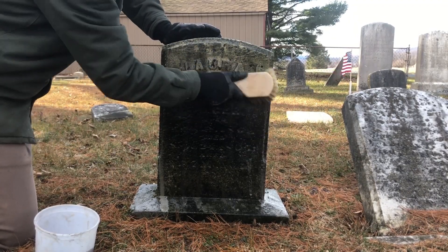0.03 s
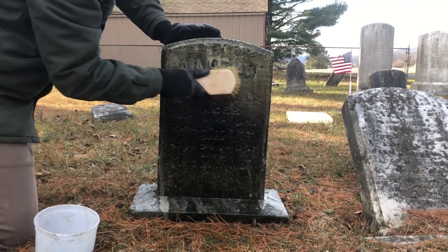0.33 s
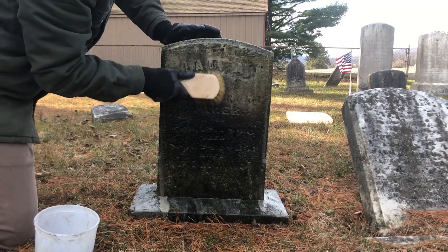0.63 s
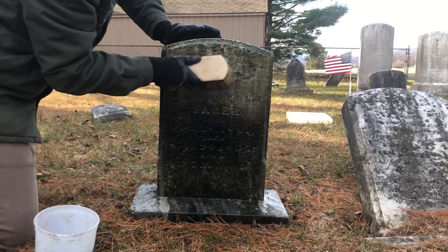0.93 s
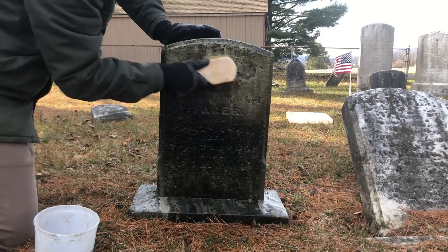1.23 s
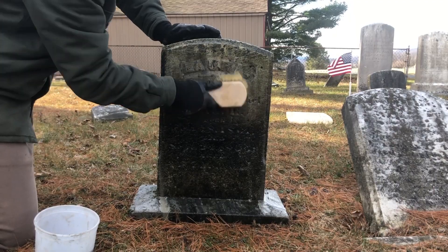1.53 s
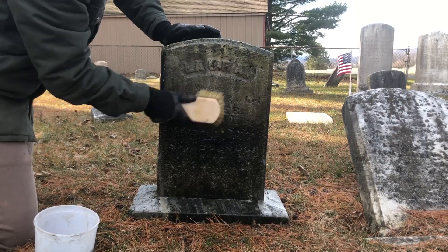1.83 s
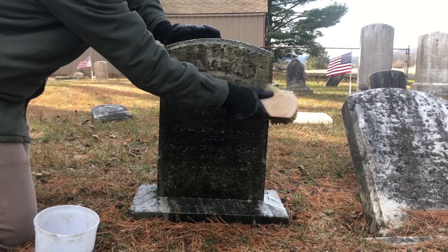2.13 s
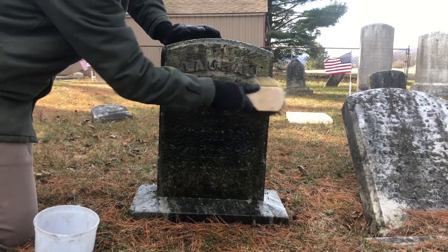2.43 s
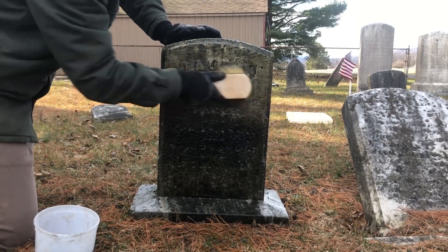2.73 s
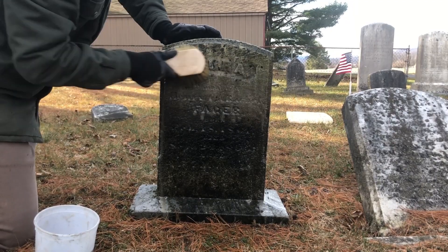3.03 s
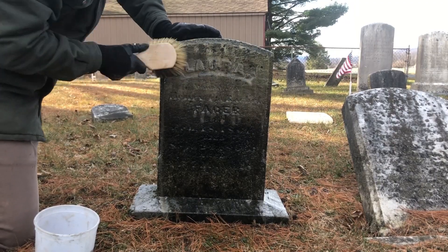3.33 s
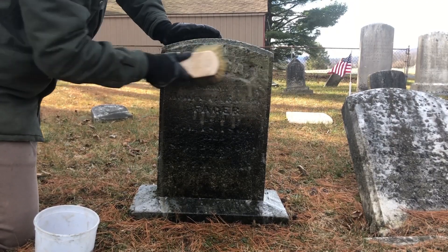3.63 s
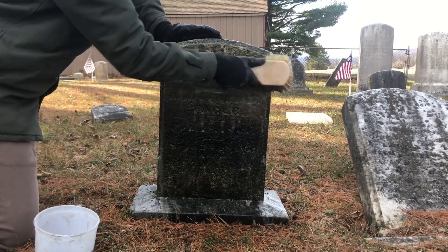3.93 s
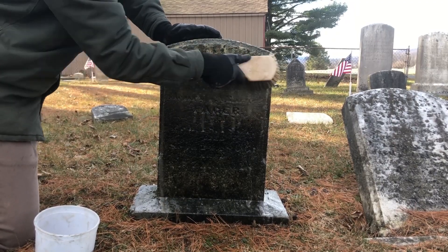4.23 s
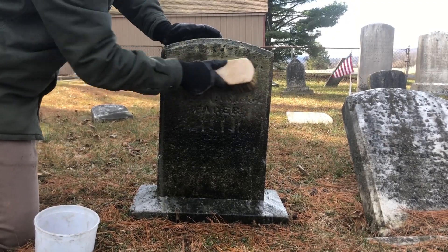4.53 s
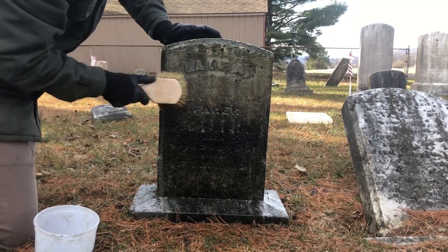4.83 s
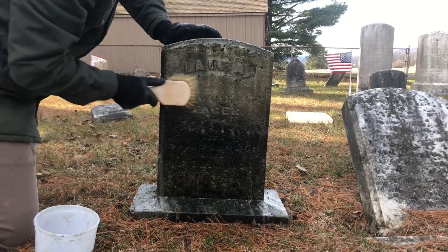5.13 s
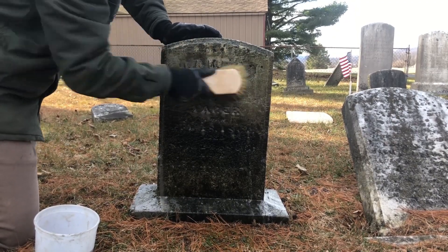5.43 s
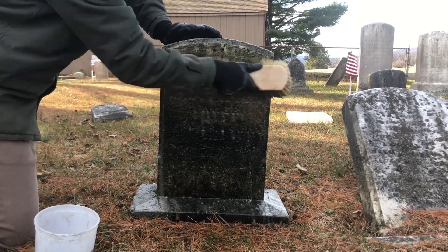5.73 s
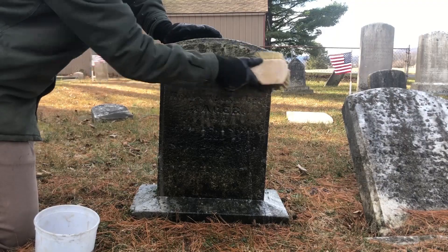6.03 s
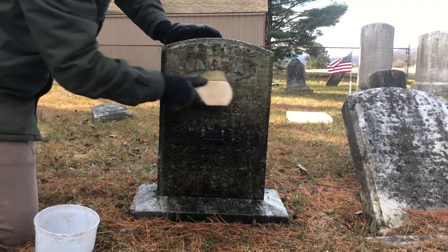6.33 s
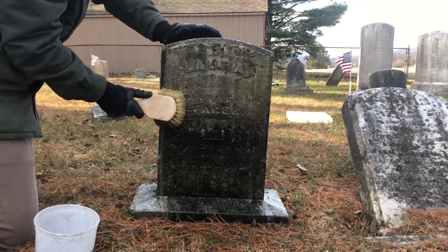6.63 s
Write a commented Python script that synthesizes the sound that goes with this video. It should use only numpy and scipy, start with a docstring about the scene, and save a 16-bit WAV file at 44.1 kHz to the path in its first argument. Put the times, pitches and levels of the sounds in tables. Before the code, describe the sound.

A stiff brush scrubs a wet headstone outdoors while wind buffets the microphone, much louder than the brush. For the first two seconds the bristles move in small quick circles, a continuous gritty hiss that swells about four times a second. From about 2 seconds to the end, near 6.7 seconds, they switch to brisk back-and-forth strokes, about six a second, with a slightly hollow rasp that changes tone between push and pull. The wind arrives at about 0.3 seconds in irregular gusts, a low rumble with flutter and short pops. The sharpest hits come between 1 and 2.3 seconds and around 4 seconds, with another strong gust near 4.7. It drops back from about 5.1 seconds, gusts again just before 6 seconds, then eases as the scrubbing continues. A faint, steady bed of outdoor air lies underneath.

```python
"""A stiff brush scrubs a wet upright stone outdoors: small circles first, then brisk strokes to and fro.
Bristle tips hiss on the grit, and the hollow between brush and stone colours push and pull differently.
Gusts buffet the microphone, much louder than the brush: large eddies rumble, small ones flutter
and single ones flick the port. A faint bed of outdoor air lies underneath."""
import sys
import numpy as np
from scipy import signal
from scipy.fft import rfft, irfft, next_fast_len
from scipy.io import wavfile
from scipy.ndimage import uniform_filter1d, minimum_filter1d, map_coordinates

SR = 44100
rng = np.random.default_rng(int(sys.argv[2]) if len(sys.argv) > 2 else 0)


def dump(signal):
    """Clip the signal to [-1, 1] and save it as 16-bit WAV at the path in sys.argv[1]."""
    limited = np.clip(np.atleast_2d(signal).T, -1, 1)
    pcm = np.round(limited * 32767).astype(np.int16)
    wavfile.write(sys.argv[1], SR, pcm)


N = 294147
TIME = np.arange(N) / SR


def from_db(db):
    """Decibels to gain."""
    return 10 ** (np.asarray(db) / 20)


def rms_one(x):
    """Scale to unit rms."""
    return x / np.sqrt(np.mean(x ** 2) + 1e-20)


def automation(rows):
    """Join timed breakpoints into one curve for each column after the time."""
    time_s, *columns = np.transpose(rows)
    return [np.interp(TIME, time_s, column) for column in columns]


def eq_db(curve, hz):
    """Read an EQ curve on a log-frequency axis."""
    freq_hz, gain_db = np.transpose(curve)
    return np.interp(np.log(hz + 1e-9), np.log(freq_hz), gain_db)


def coloured(x, curve):
    """Shape x with an EQ curve; rms 1."""
    size = next_fast_len(N)
    gain = from_db(eq_db(curve, np.fft.rfftfreq(size, 1 / SR)))
    return rms_one(irfft(rfft(x, size) * gain, size)[:N])


def drift(rate_hz):
    """A smooth random modulator, rolling off above rate_hz; rms 1."""
    step, settle = 16, 2000
    lowpass = signal.butter(2, rate_hz, fs=SR / step, output="sos")
    slow = signal.sosfilt(lowpass, rng.standard_normal(N // step + settle + 2))[settle:]
    return np.interp(np.arange(N) / step, np.arange(len(slow)), rms_one(slow))


def filtered(x, order, hz, kind):
    """Butterworth filter."""
    return signal.sosfilt(signal.butter(order, hz, kind, fs=SR, output="sos"), x)


def evened(x, samples):
    """Ride the level of a noise so that its short-term rms stays near 1."""
    return x / np.sqrt(uniform_filter1d(uniform_filter1d(x * x, samples), samples) + 1e-12)


def bent(x, bend):
    """Varispeed: raise or lower all pitches by a changing fraction."""
    return map_coordinates(x, [np.cumsum(1 + bend - bend.mean())], order=3, mode="mirror")


def slips(speed, density, spread_db):
    """Bristle tips snap over grains of stone, more often the faster they move; rms 1."""
    chance = np.clip(density * (speed + 0.11) / SR, 1e-4, 1)
    sizes = rng.standard_normal(N) * from_db(spread_db * rng.standard_normal(N))
    return rms_one((rng.random(N) < chance) * sizes / np.sqrt(chance))


# EQ of bristle tips on grit: freq_hz, gain_db
HISS_EQ = [(1200, -3), (2500, 4), (3300, 1.5), (4200, -0.5), (6300, 1), (7800, 0), (10000, 1.5), (12200, 3),
           (14000, 0.5), (16000, 2.5)]

def bristle_hiss(speed, shimmer_db=1.6, shimmer_hz=9):
    """Dense slips blur into hiss; tufts touch and let go, so each treble band swells on its own."""
    rest = coloured(slips(speed, density=40000, spread_db=-2.2), HISS_EQ)
    shimmering = 0
    for crossover_hz in np.geomspace(3500, 12500, 6):
        band = signal.sosfiltfilt(signal.butter(4, crossover_hz, fs=SR, output="sos"), rest)
        shimmering = shimmering + band * from_db(shimmer_db * drift(shimmer_hz))
        rest = rest - band
    return shimmering + rest


# Resonances of the brush against the stone, pushed and pulled: pitch_hz, width_hz, gain_db
PUSH_MODES = [(1210, 350, 0.5), (1750, 146, -6.5), (2266, 88, 6), (2790, 76, -2.5)]
PULL_MODES = [(1220, 210, 10.5), (1684, 310, 18.5), (2260, 120, -1.5), (2880, 130, -20)]

def hollow_rasp(speed, push_pull_power, glide=0.03, wander=0.0122):
    """Slips ring the hollow under the brush; with speed the tufts lean, it shrinks and the pitch lifts."""
    scrape = filtered(slips(speed, density=7000, spread_db=2.5), 2, [950, 3600], "band")
    bend = glide * speed + wander * drift(7.93)
    rasp = 0
    for modes, power in zip([PUSH_MODES, PULL_MODES], push_pull_power):
        ring = 0
        for k, (pitch_hz, width_hz, gain_db) in enumerate(modes):
            radius = np.exp(-np.pi * width_hz / SR)
            poles = [1, -2 * radius * np.cos(2 * np.pi * pitch_hz / SR), radius ** 2]
            gain = (-1) ** k * from_db(gain_db) * (1 - radius ** 2) / 2
            ring = ring + gain * signal.lfilter([1, 0, -1], poles, scrape)
        rasp = rasp + bent(rms_one(ring), bend) * np.sqrt(power)
    return rasp


# Circling, with two early hitches and a swell in each turn: time_s, level_db, swell_db
CIRCLING = [(0.0, -68, 3), (0.27, -66.5, -5.5), (0.3, -85, 13), (0.355, -62.5, -1), (0.425, -72.5, 2.5),
            (0.48, -67, 3), (0.95, -66.5, 4), (1.3, -66.5, -0.5), (2.0, -68.5, 1)]

def circles(circle_s=0.23, first_push_s=0.5, catch_db=0.5, fade_s=0.047, rasp_db=-5.0, bite=0.61):
    """The hand pushes and pulls once a circle. Gives speed, hiss power and push/pull rasp power."""
    pushing = np.cos(np.pi * (TIME - first_push_s) / circle_s) ** 2
    level_db, swell_db = automation(CIRCLING)
    fade_out = np.clip(1 - (TIME - STROKES[0][0]) / fade_s, 0, 1)   # hands over to the first stroke
    envelope = from_db(level_db + swell_db * (pushing - 0.5) + catch_db * drift(14.4)) * fade_out
    push_pull = np.array([pushing ** 2 * from_db(swell_db) ** bite, 1 - pushing])
    speed = 0.5 * envelope / envelope.max()
    return speed, envelope ** 2, push_pull * (envelope * from_db(rasp_db)) ** 2


# Strokes to and fro: start_s, length_s, level_db, rasp_offset_db, lean (0 pulled, 1 pushed)
STROKES = [(1.988, .188, -62.5, -2, 0.75), (2.219, .125, -61, -6, 0.26), (2.366, 0.1455, -62.5, -2.5, 0.58),
           (2.557, 0.131, -61.5, -6, 0), (2.7, 0.161, -63, -1, .6), (2.89, 0.156, -62, -11, 0.3),
           (3.04, 0.1764, -64.5, -1.5, 0.76), (3.254, .135, -62.5, -25, 0), (3.401, 0.171, -63.5, -3, 0.18),
           (3.62, 0.1324, -62, -7, 0.22), (3.769, 0.1644, -64, -1, 1), (3.968, 0.1625, -66, -6, 0.29),
           (4.09, 0.1727, -65, -4, 0.95), (4.271, 0.199, -63, -8.5, 0.072), (4.481, 0.201, -65.5, -4, 1),
           (4.692, 0.164, -62.5, -3, 0.12), (4.87, 0.1657, -62.5, 0.5, 0), (5.078, 0.149, -61.5, -3.5, 0),
           (5.241, 0.151, -61, -2.5, 0.37), (5.432, 0.137, -61, -11.5, 0.12),
           (5.591, 0.162, -63.5, -1, 0.87), (5.788, .143, -62, -8, 0), (5.947, 0.1673, -63, 0, 0.98),
           (6.155, 0.1376, -62, -18, .8), (6.321, 0.1535, -60.5, -5, 0.052), (6.513, 0.1733, -62.5, 0, 0)]

def brush(hiss_curve=1.16, rasp_curve=1.9, hiss_trim_db=2.5, rasp_trim_db=-1.06, pitted_db=0.86):
    """After the circles each stroke speeds up and comes to rest; hiss and rasp follow the hand."""
    speed, hiss_power, rasp_power = circles()
    for start_s, length_s, level_db, rasp_offset_db, lean in STROKES:
        during = (TIME > start_s) & (TIME < start_s + length_s)
        swing = np.abs(np.sin(np.pi * (TIME[during] - start_s) / length_s))
        speed[during] += swing
        hiss_power[during] += (from_db(level_db) * swing ** hiss_curve) ** 2
        rasp_envelope = from_db(level_db + rasp_offset_db) * swing ** rasp_curve
        rasp_power[:, during] += np.outer([lean, 1 - lean], rasp_envelope ** 2)
    hiss = from_db(hiss_trim_db) * bristle_hiss(speed) * np.sqrt(hiss_power)
    rasp = from_db(rasp_trim_db) * hollow_rasp(speed, rasp_power)
    return (hiss + rasp) * from_db(pitted_db * drift(19))   # the stone is pitted


# EQ of still outdoor air: freq_hz, gain_db
AIR_EQ = [(15, -39), (50, 7.5), (100, 4.5), (300, -18), (700, -18.5), (1500, -11), (2600, -15.5),
          (4500, -27.5), (9000, -30.5), (16000, -34)]

def still_air(level_db=-69.5):
    """A faint, steady bed of outdoor ambience."""
    return from_db(level_db) * coloured(rng.standard_normal(N), AIR_EQ)


# EQ of large slow eddies: freq_hz, gain_db
RUMBLE_EQ = [(12, -54), (25, -61), (40, -53), (60, -10), (85, 2), (115, 2.5), (170, -0.5), (250, -4.5),
             (350, -11.5), (600, -53), (3000, -100)]

def wind_rumble(rumble_db, trim_db=-1.5):
    """Large eddies at the microphone port give the wind its low end."""
    return from_db(rumble_db + trim_db) * evened(coloured(rng.standard_normal(N), RUMBLE_EQ), samples=900)


# EQ of small quick eddies: freq_hz, gain_db
BUFFET_EQ = [(150, -7), (260, -0.5), (370, 2), (520, -3), (750, -10), (1050, -17), (1450, -26.5),
             (2000, -46), (3000, -41.5)]

def wind_buffeting(buffet_db, trim_db=0.39, lump_hz=80, brightening=0.74, pivot_db=-43):
    """Lumpy turbulence at the port: the harder it blows, the smaller the eddies and brighter the tone."""
    lumps = np.clip(drift(lump_hz), -2, 1.6)
    white = rng.standard_normal((2, N))
    edges_hz = np.geomspace(150, 3400, 10)
    flutter = 0
    for k, (low_hz, high_hz) in enumerate(zip(edges_hz, edges_hz[1:])):
        centre_hz = np.sqrt(low_hz * high_hz)
        octaves_up = max(np.log2(centre_hz / 450), 0)
        band = filtered(white[k % 2], 2, [low_hz, high_hz], "band")
        tilt_db = brightening * octaves_up * (buffet_db - pivot_db)
        lump_db = (6 + 0.36 * octaves_up) * lumps
        flutter = flutter + band * from_db(eq_db(BUFFET_EQ, centre_hz) + tilt_db + lump_db)
    return from_db(buffet_db + trim_db) * evened(filtered(flutter, 4, 1950, "low"), samples=600)


# The breeze between gusts: time_s, rumble_db, buffet_db
BREEZE = [(0.0, -64.5, -83), (0.9, -52.5, -62), (2.0, -54, -69), (2.6, -52.5, -62), (3.0, -57, -75),
          (3.7, -53.5, -79), (4.4, -55, -72), (5.1, -56, -71.5), (5.4, -68, -81.5), (5.55, -56, -72),
          (6.2, -58.5, -72), (6.67, -63.5, -76.5)]
# Gusts on the microphone: start_s, length_s, rumble_db, buffet_db
GUSTS = [(0.083, 0.012, -55, -67), (0.296, 0.023, -47, -45.5), (0.337, 0.034, -37, -46),
         (0.4, 0.11, -46, -55.5), (0.61, 0.049, -39.5, -46.5), (0.736, 0.13, -43.5, -57),
         (0.868, .035, -47, -50.5), (0.932, 0.042, -43, -48.5), (1.002, 0.12, -41.5, -48.5),
         (1.133, 0.065, -39, -47.5), (1.395, 0.23, -40, -46), (1.688, 0.091, -39.5, -44),
         (1.856, 0.12, -45.5, -51.5), (2.13, 0.017, -41, -42), (2.207, 0.09, -43.5, -46),
         (2.335, 0.056, -41.5, -45.5), (2.43, 0.39, -47.5, -55.5), (2.83, 0.11, -41, -47.5),
         (3.082, 0.064, -41.5, -54.5), (3.218, 0.0071, -44.5, -66), (3.292, 0.07, -39.5, -45),
         (3.398, 0.19, -52, -49.5), (3.52, 0.29, -43, -47.5), (3.824, .065, -37.5, -42.5),
         (3.911, 0.099, -40, -46), (4.031, 0.14, -44, -54.5), (4.25, 0.01, -34, -48.5),
         (4.324, 0.027, -55, -60.5), (4.504, 0.076, -47, -56), (4.612, 0.082, -40, -50.5),
         (4.702, .16, -39, -43.5), (4.885, 0.18, -43.5, -53.5), (5.146, 0.018, -42.5, -59),
         (5.714, 0.015, -42.5, -46.5), (5.839, 0.067, -37, -46.5), (5.947, 0.033, -35.5, -49),
         (6.295, 0.036, -47.5, -53.5)]

def gusts(sag_db_per_s=10, puff_hz=22, rumble_puff_db=2.5, buffet_puff_db=3.5, breeze_puff_db=6.5):
    """Gusts hit, sag and die over the breeze, all broken into puffs. Gives rumble and buffeting in dB."""
    puffs = np.clip(drift(puff_hz), -2, 1.7)
    breeze = from_db(np.array(automation(BREEZE)) + breeze_puff_db * puffs)
    rumble_edges_s, buffet_edges_s = (0.016, 0.023), (0.007, 0.015)   # large eddies build slower, linger
    power = np.zeros((2, N))
    for start_s, length_s, *levels_db in GUSTS:
        first = int(start_s * SR)
        age = TIME[:N - first]
        age = age[age < 2 * length_s + 0.1]
        sag_db = sag_db_per_s * (age - length_s / 2)
        for layer, (attack_s, release_s) in enumerate([rumble_edges_s, buffet_edges_s]):
            envelope = np.minimum(age / attack_s, 1) * np.exp(-np.maximum(age - length_s, 0) / release_s)
            power[layer, first:first + len(age)] += (envelope * from_db(levels_db[layer] - sag_db)) ** 2
    power *= from_db(np.outer([rumble_puff_db, buffet_puff_db], puffs)) ** 2
    power[1] += swirl_power()
    return 10 * np.log10(power + breeze ** 2)


# The sharpest single eddies that flick the microphone: start_s, level_db, pitch_hz
FLICKS = [(0.346, -38, 650), (0.826, -34, 475), (1.054, -30.5, 730), (1.097, -31.5, 680),
          (1.42, -30.5, 600), (1.698, -29, 617), (1.749, -26.5, 730), (2.22, -34, 660), (2.234, -29.5, 820),
          (2.347, -33, 705), (3.295, -35, 450), (3.408, -41, 490), (3.704, -33.5, 640), (3.848, -30, 433),
          (3.87, -34, 550), (3.956, -23.5, 840), (3.992, -33, 504), (4.095, -33, 530), (4.147, -37, 700),
          (4.615, -35.5, 704), (4.684, -37, 695), (4.743, -36.5, 625), (4.796, -34, 700), (5.858, -31, 860),
          (5.874, -27.5, 580), (5.927, -37.5, 497), (5.952, -39.5, 775)]

def flicks(buffet_db, trim_db=-2.0, snap_above_db=-28, snap_slope=0.7, samples=1024):
    """A small eddy gives one short pressure pulse; the hardest ones open up into a brighter snap."""
    eddies = FLICKS + lesser_eddies(buffet_db)
    polarity = rng.choice([-1, 1], N)
    track = np.zeros(N + samples)
    for start_s, level_db, pitch_hz in eddies:
        at = int(start_s * SR)
        snap = from_db(np.clip(snap_slope * (level_db - snap_above_db), 0, 3))
        band_hz = [0.65 * pitch_hz, 1.72 * pitch_hz * snap]
        pulse = filtered(signal.unit_impulse(samples), 3, band_hz, "band")
        track[at:at + samples] += from_db(level_db + trim_db) * polarity[at] * pulse / np.abs(pulse).max()
    return track[:N]


def lesser_eddies(buffet_db, per_s=18, lift_db=8, spread_db=2, cap_db=-34, pitch_hz=628, spread_oct=0.3):
    """Cues for softer flicks, scattered at random and carried by the gusts."""
    levels_db = np.minimum(buffet_db + lift_db + spread_db * rng.standard_normal(N), cap_db)
    pitches_hz = pitch_hz * 2 ** (spread_oct * rng.standard_normal(N))
    hits = np.flatnonzero(rng.random(N) < per_s / SR)
    return [(TIME[i], levels_db[i], pitches_hz[i]) for i in hits]


def swirl_power(width_s=0.0065, offset_db=-10):
    """Each of the sharpest flicks sits in a brief swirl of buffeting."""
    power = 0
    for start_s, level_db, _ in FLICKS:
        bell = np.exp(-np.minimum(((TIME - start_s) / width_s - 0.5) ** 2, 50))
        power = power + from_db(level_db + offset_db) ** 2 * bell
    return power


def scene():
    """Brush, wind and still air at one microphone."""
    air = still_air()
    rumble_db, buffet_db = gusts()
    scrubbing = brush()
    wind = wind_rumble(rumble_db) + wind_buffeting(buffet_db) + flicks(buffet_db)
    return (scrubbing + wind + air)[None]


def limited(x, ceiling_db=-27.5, samples=45):
    """A fast limiter eases the strongest pressure peaks."""
    allowed = np.minimum(from_db(ceiling_db) / (np.abs(x) + 1e-9), 1)
    gain = minimum_filter1d(allowed, 2 * samples)
    return x * uniform_filter1d(uniform_filter1d(gain, samples), samples)


def record(dry):
    """Master chain: low cut, limiter, steep high cut."""
    low_cut_hz, high_cut_hz = 45, 15560
    high_cut = signal.ellip(12, 0.1, 70, high_cut_hz, fs=SR, output="sos")
    return signal.sosfilt(high_cut, limited(filtered(dry, 4, low_cut_hz, "high")))


dry = scene()
out = record(dry)
dump(out)
```